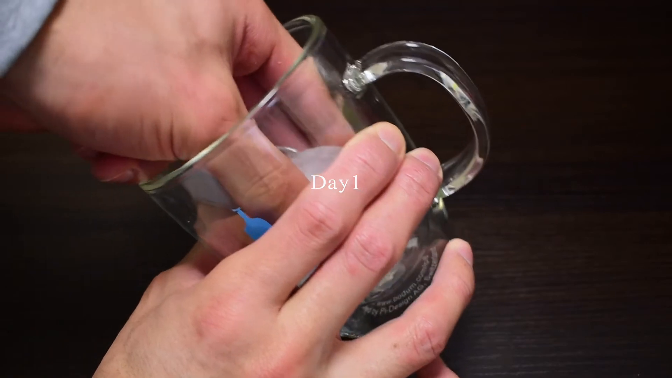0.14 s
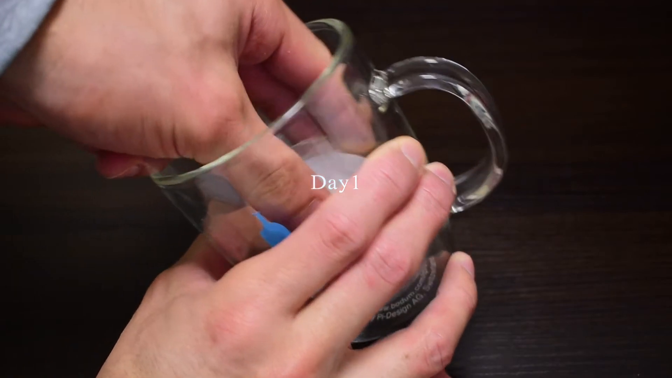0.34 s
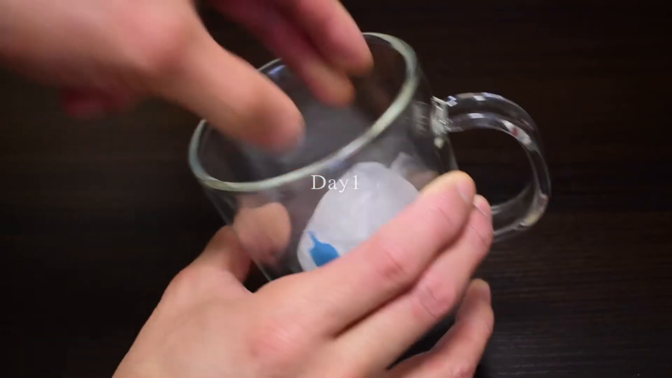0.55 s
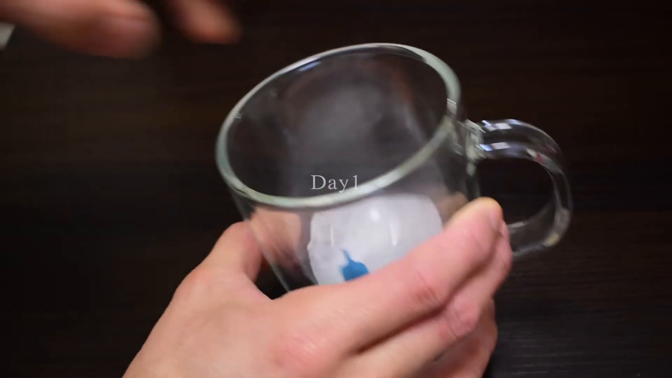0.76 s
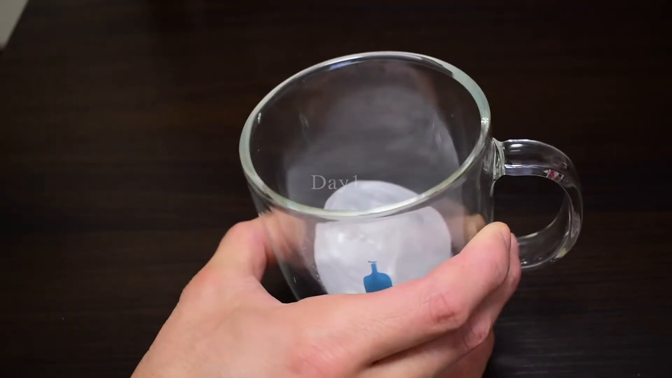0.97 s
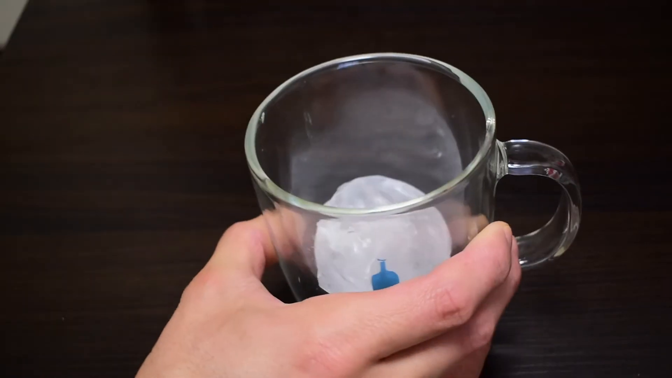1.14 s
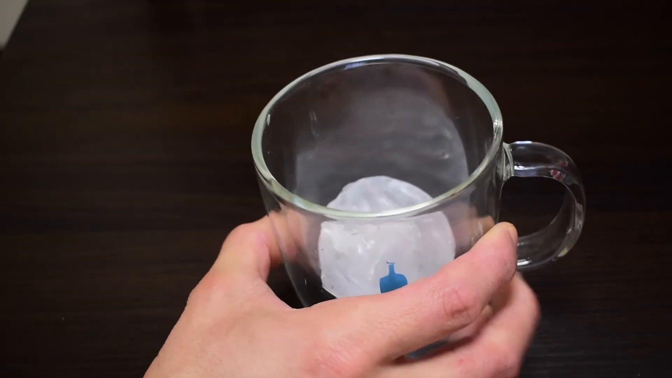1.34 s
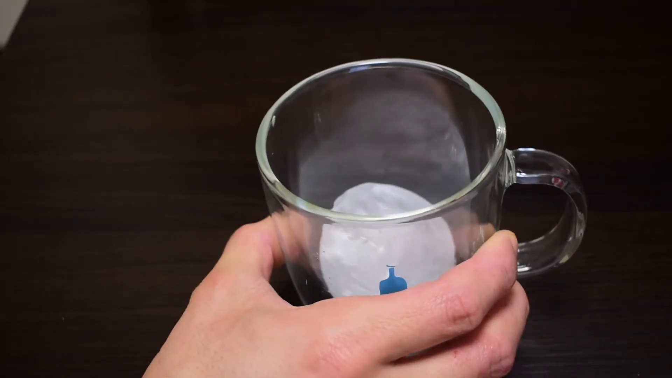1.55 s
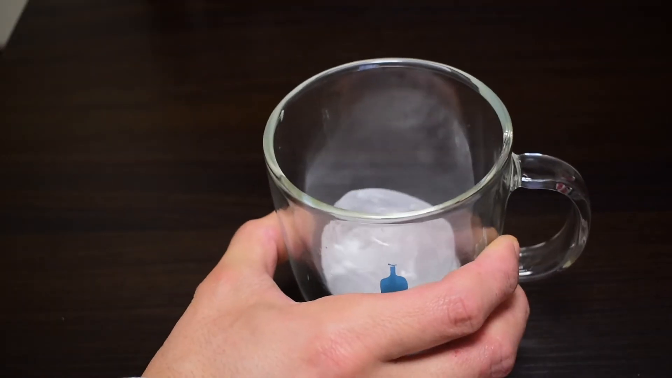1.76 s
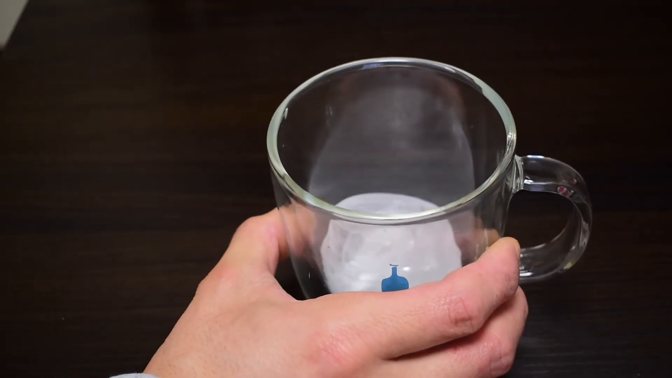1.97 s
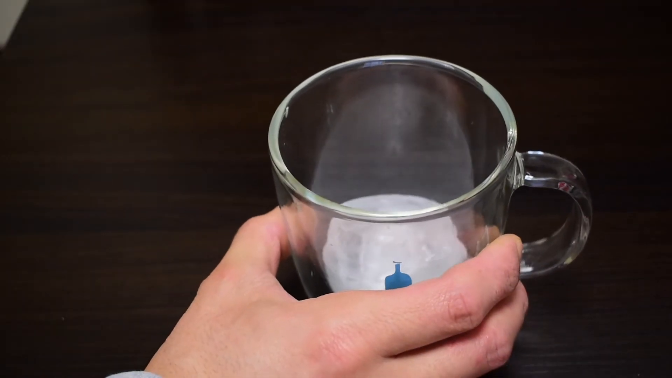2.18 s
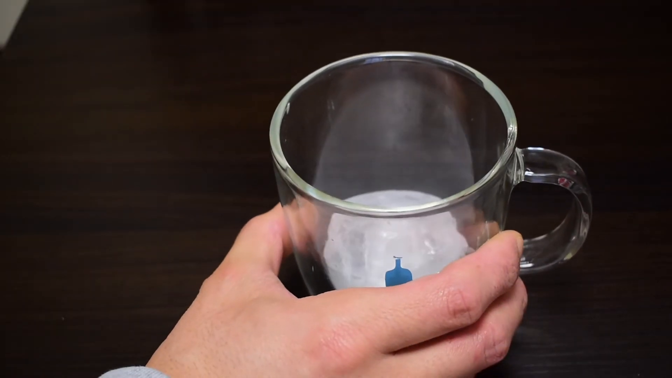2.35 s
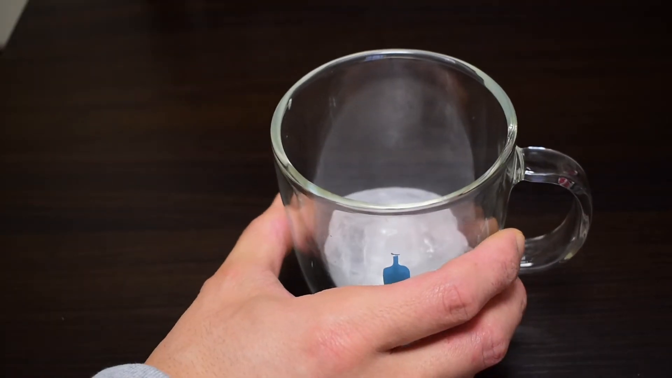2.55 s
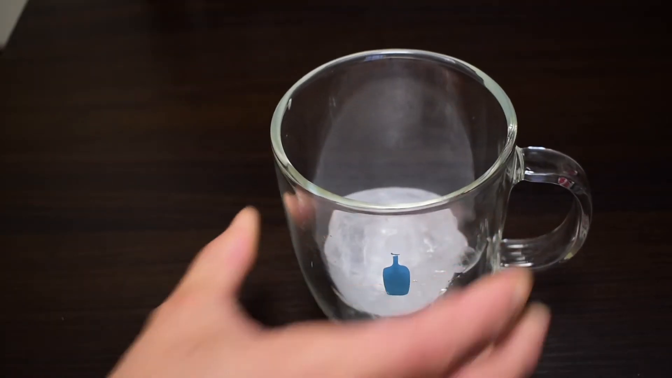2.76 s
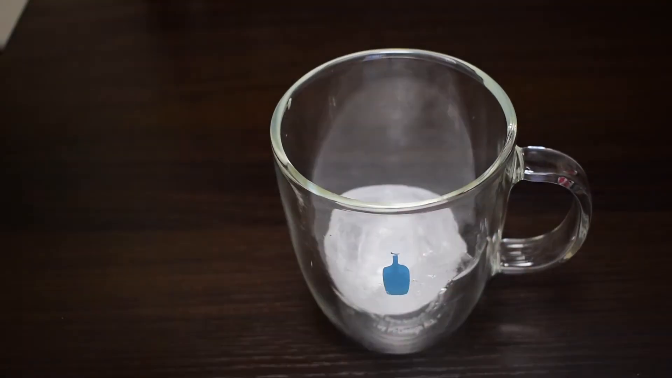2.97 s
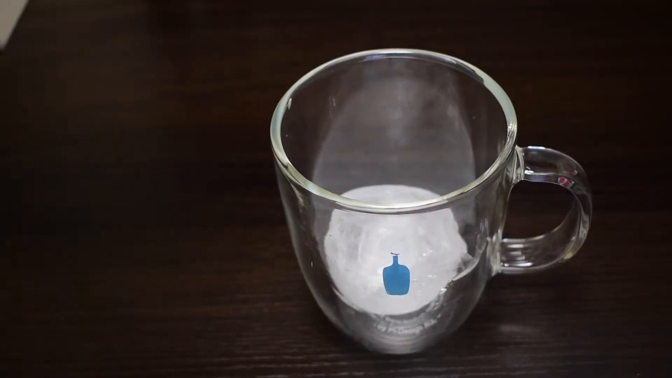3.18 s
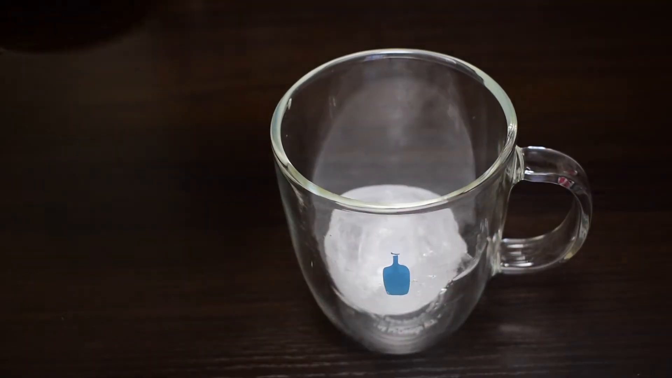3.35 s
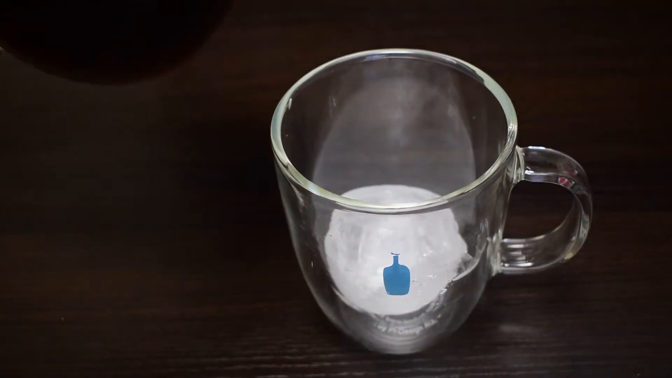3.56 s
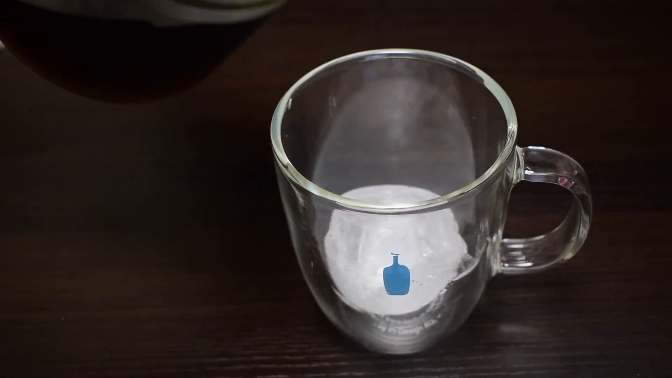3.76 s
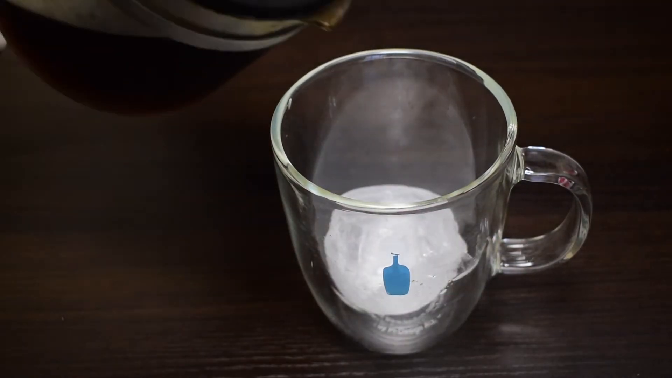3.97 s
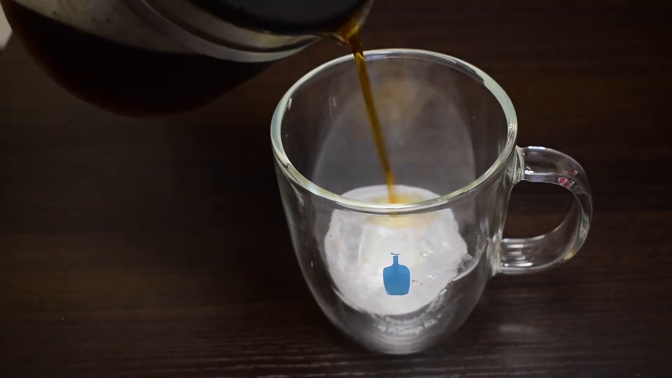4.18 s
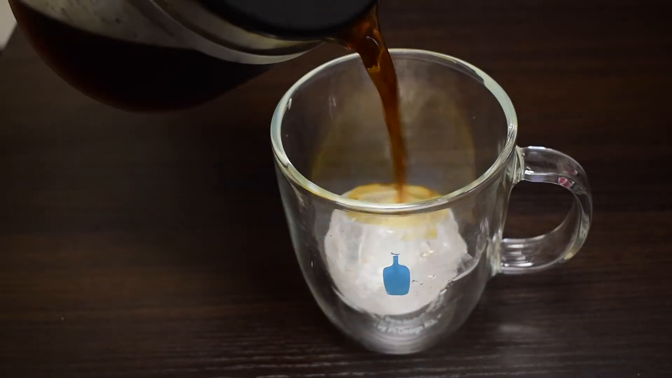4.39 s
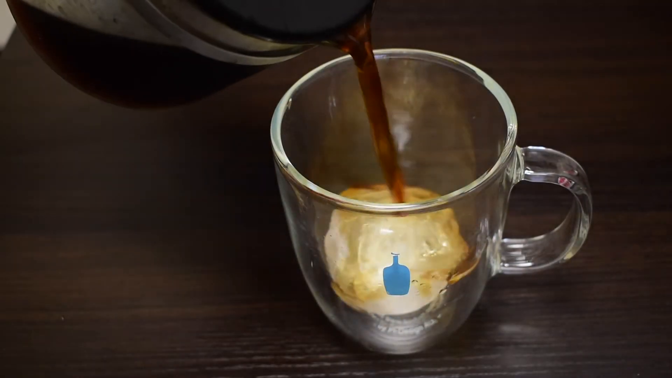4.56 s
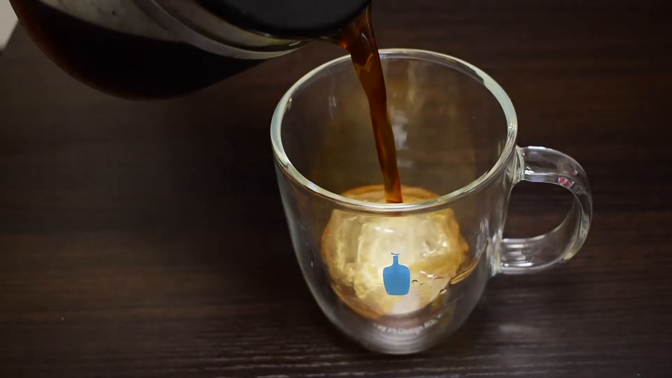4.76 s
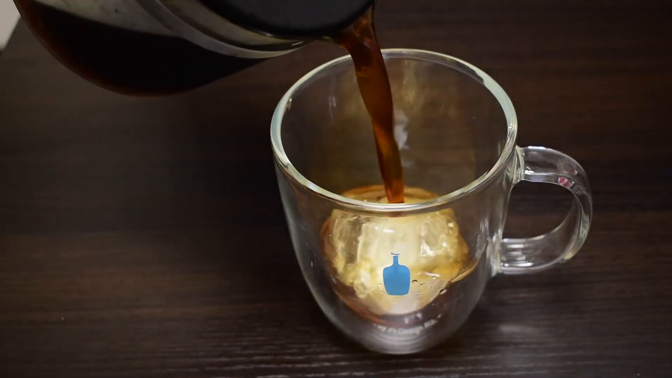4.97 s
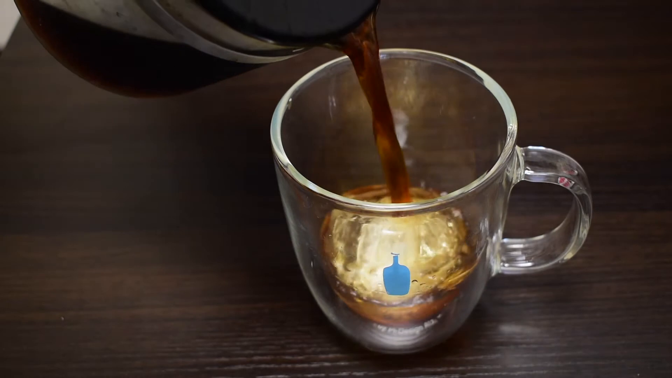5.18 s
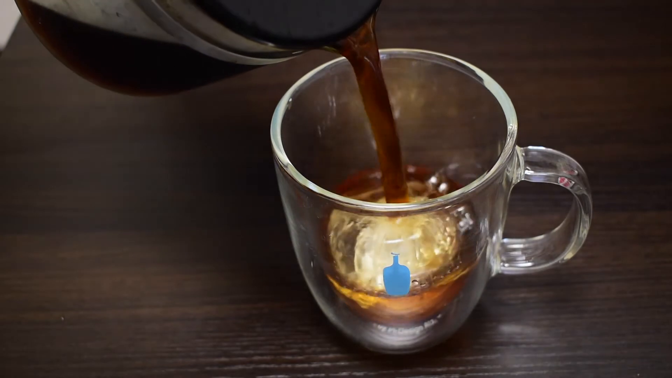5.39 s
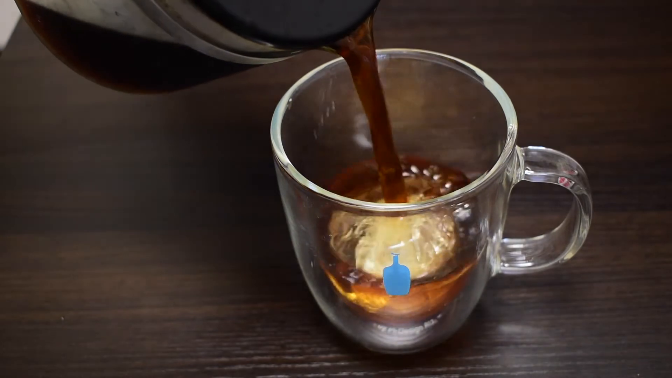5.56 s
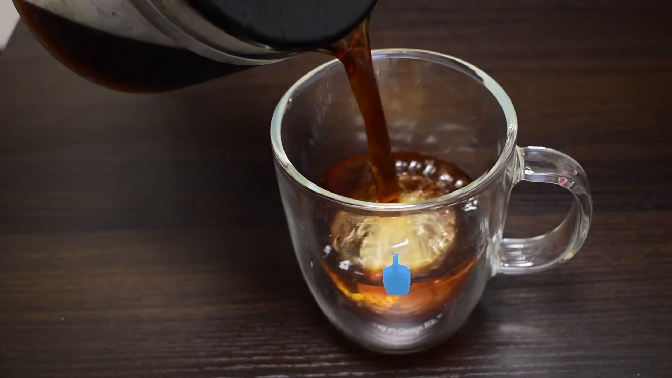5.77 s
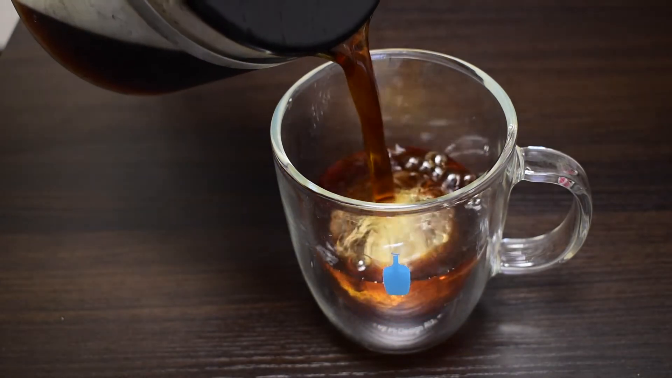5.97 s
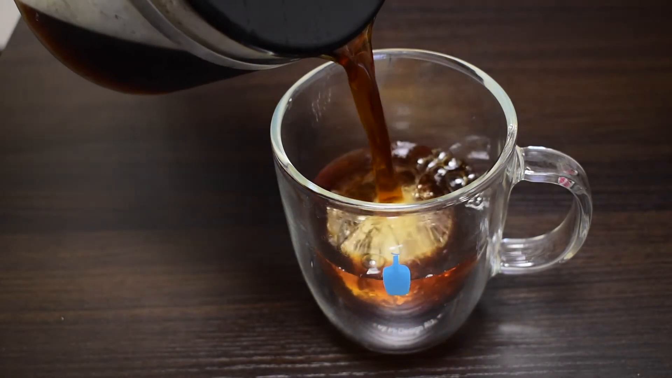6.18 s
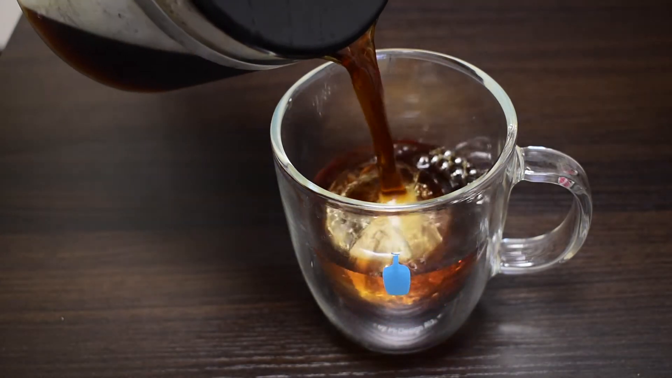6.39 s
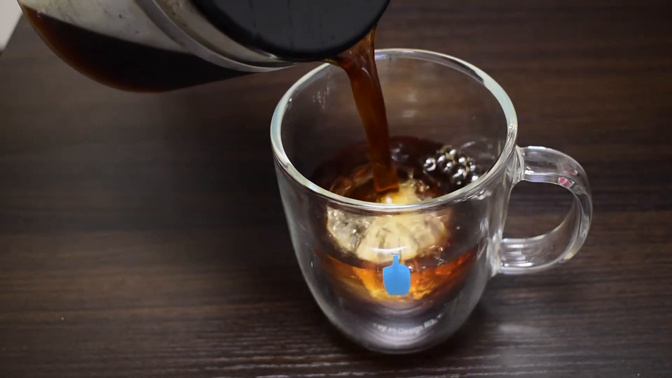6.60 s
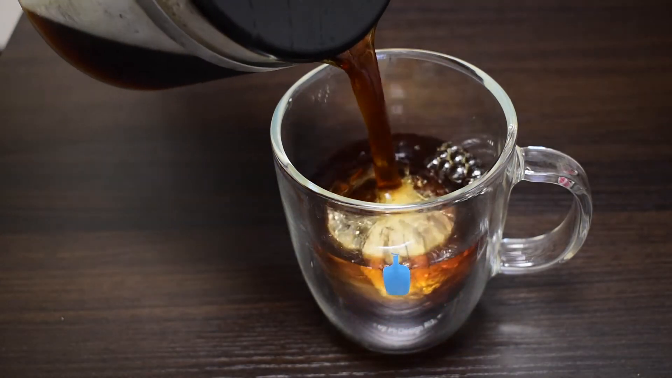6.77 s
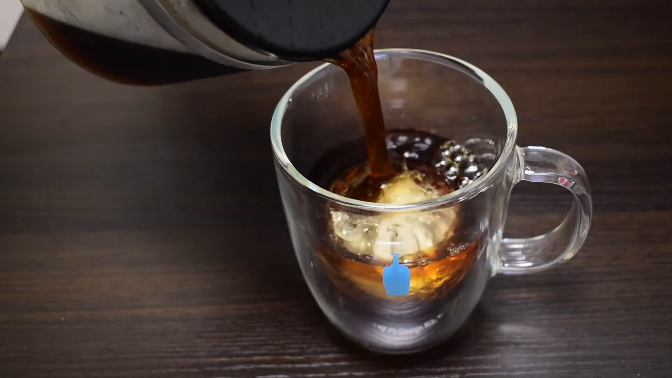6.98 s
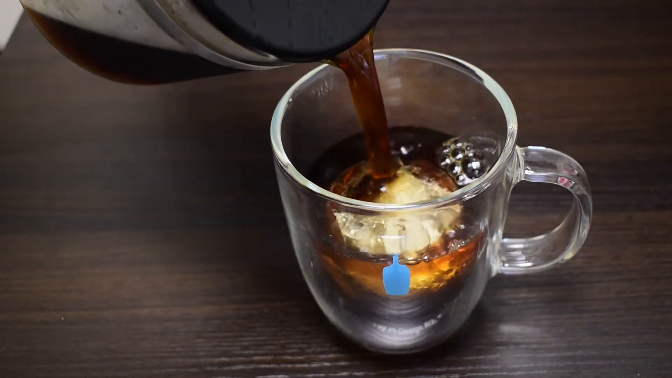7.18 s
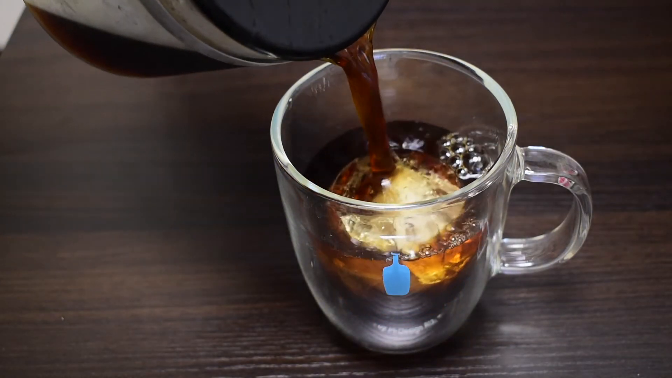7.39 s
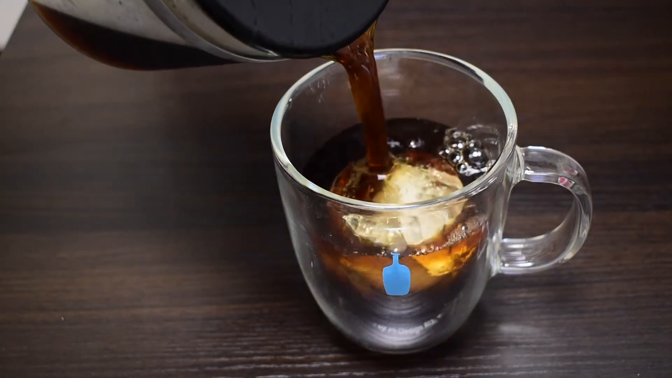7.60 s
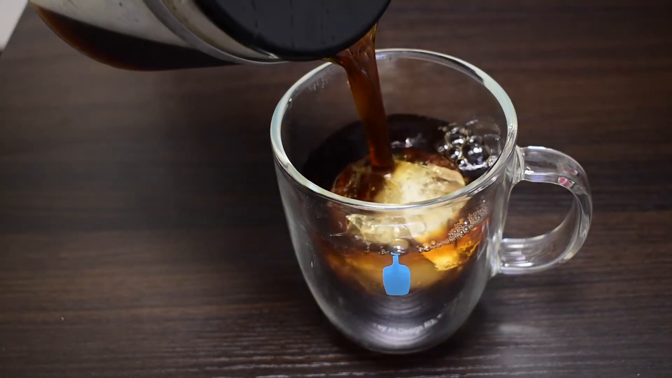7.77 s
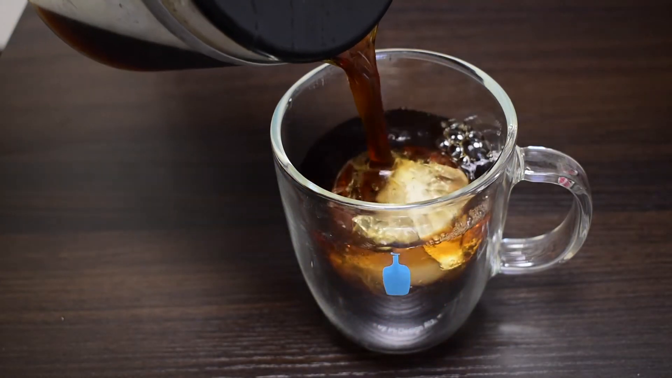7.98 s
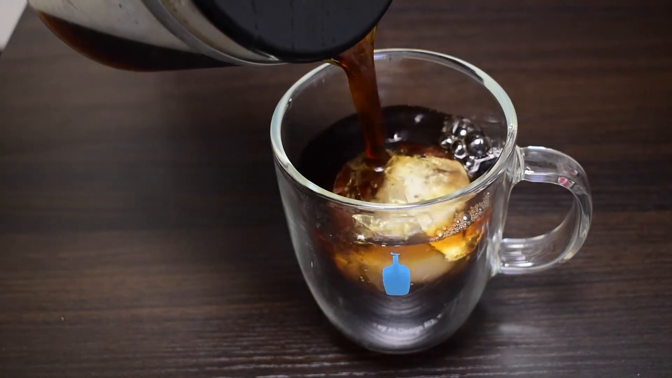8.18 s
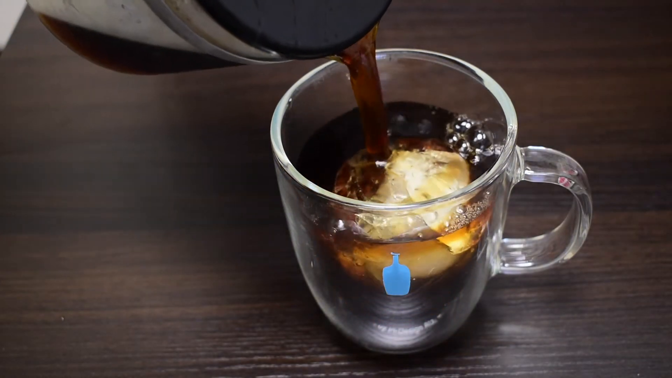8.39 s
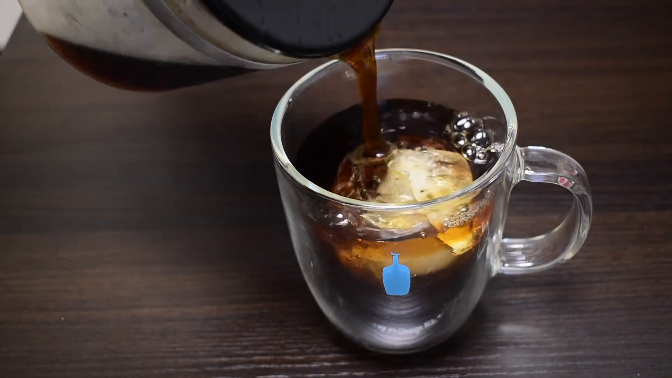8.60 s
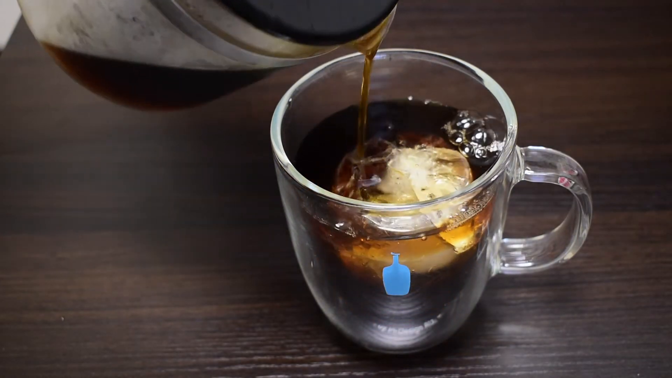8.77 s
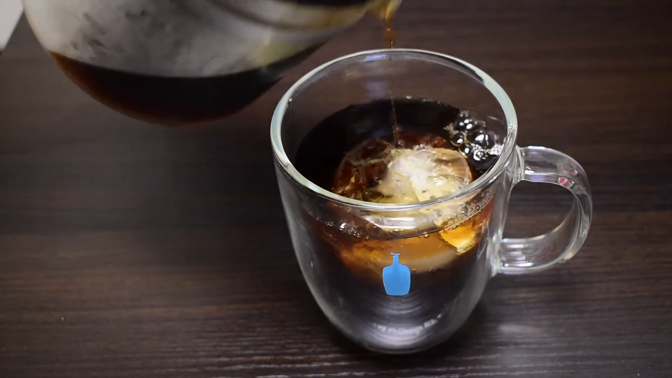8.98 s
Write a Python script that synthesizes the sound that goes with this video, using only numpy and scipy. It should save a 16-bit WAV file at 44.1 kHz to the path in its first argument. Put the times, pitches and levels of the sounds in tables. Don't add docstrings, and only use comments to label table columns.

```python
import sys
import numpy as np
from scipy import signal
from scipy.fft import rfft, irfft
from scipy.io import wavfile

SR = 44100
rng = np.random.default_rng(int(sys.argv[2]) if len(sys.argv) > 2 else 0)


def to_linear_factor(level_db):
    exponent = np.asarray(level_db, float) / 20
    return 10 ** exponent


def unload_wav(signal):
    wavfile.write(
        sys.argv[1],
        SR,
        np.round(np.clip(np.atleast_2d(signal).T, -1, 1) * 32767).astype(np.int16),
    )


N = 398663
T = np.arange(SR // 5) / SR
PATHS = 5


def along(points, hz):
    f, v = np.transpose(points)
    return np.interp(np.log(hz + 1), np.log(f + 1), v)


def unit(x):
    return x / np.sqrt(np.mean(x ** 2) + 1e-20)


def coloured(x, points):
    size = 8192
    half = size // 2
    gain = to_linear_factor(along(points, np.fft.rfftfreq(size, 1 / SR)))
    cepstrum = irfft(np.log(gain + 1e-9), size)
    folded = np.r_[cepstrum[0], 2 * cepstrum[1:half], np.zeros(half)]
    response = irfft(np.exp(rfft(folded)), size)
    response = response.reshape((1,) * (x.ndim - 1) + (size,))
    return signal.oaconvolve(x, response, axes=-1)[..., :x.shape[-1]]


def level(tables):
    time = np.arange(N) / SR
    return sum(to_linear_factor(np.interp(time, *np.transpose(rows), left=-150, right=-150)) for rows in tables)


def hiss(spectrum, alike):
    share = [(hz, 10 * np.log10(np.clip([1 + c, 1 - c], .004, 2))) for hz, c in alike]
    mid = coloured(rng.standard_normal(N), [(hz, db[0]) for hz, db in share])
    side = coloured(rng.standard_normal(N), [(hz, db[1]) for hz, db in share])
    return unit(coloured(np.array([mid + side, mid - side]), spectrum))


def add(tracks, s, sound):
    start = round((s + .0007) * SR)
    tracks[start % PATHS, start:start + len(sound)] += sound[:N - start]


def ring(hz, db, t60, attack, rise=0, rough=0):
    hz, db, t60, rough = (np.reshape(v, (-1, 1)) for v in (hz, db, t60, rough))
    steps = rng.standard_normal((len(hz), len(T) // 49))
    wander = np.cumsum(steps, axis=1).repeat(49, axis=1)
    t = T[:int(1.2 * SR * t60.max())]
    turns = hz * (t + rise * t * t / (2 * t60)) + rough * wander[:, :len(t)]
    envelope = (1 - np.exp(-t / attack)) * to_linear_factor(db - 60 * t / t60)
    return (envelope * np.sin(2 * np.pi * turns)).sum(axis=0)


def snap(colour, t60, attack, click=0):
    t = T[:int(1.2 * SR * min(t60, .15)) + 400]
    envelope = (1 - np.exp(-t / attack)) * to_linear_factor(-60 * t / t60)
    burst = envelope * rng.standard_normal(len(t))
    return coloured(burst + click * (t == 0), colour)


# pitch_hz, level_db (per Hz)
AIR_COLOUR = [(14, -41), (30, -7.5), (130, -6), (391, -2), (1230, -6), (3890, -14), (14100, -36.5),
              (16300, -50)]
# time_s, level_db
AIR_LEVEL = [(0.0, -51), (2.84, -59), (9.04, -60)]
# pitch_hz, likeness (0 to 1)
AIR_ALIKE = [(60, 0.53), (380, 0.33), (2380, 0.048)]


def room_air():
    return to_linear_factor(0.5) * level([AIR_LEVEL]) * hiss(AIR_COLOUR, AIR_ALIKE)


# time_s, level_db
HANDS_LEVEL = [(0.0, -76.5), (2.26, -52.5), (3.07, -70), (9.04, -74.5)]
# pitch_hz, level_db (per Hz)
HANDS_COLOUR = [(40, -19), (120, 0), (330, -2), (600, -13.5), (1200, -37.5)]


def hands():
    return to_linear_factor(-1.0) * level([HANDS_LEVEL]) * hiss(HANDS_COLOUR, [(200, 0.59)])


# start_s, level_db, free_s (until the next contact stills the glass)
DROPS = [
    (0.035, -18.5, .2),
    (0.1674, -19.5, .2),
    (0.3428, -18.5, .2),
    (0.4493, -18.5, 0.23),
    (0.5527, -25, .2),
    (2.201, -35.5, .2),
    (0.796, -5, 0.054),
    (0.847, -14, 0.11),
    (1.227, -40, .2),
    (4.5546, -30, .2),
]
# pitch_hz, level_db, fade_s (to -60 dB)
DROP_TONES = [
    [(835, -4.5, 0.06), (1198, 1, 0.054), (1330, -1, 0.11), (2130, -9, 0.056), (2440, -17, 0.13),
     (2750, -16.5, 0.12), (3165, -19, 0.14), (4850, -17, 0.11), (8060, -25.5, 0.12)],
    [(866, 0, 0.26), (1302, -2, 0.15), (2150, -19, .06), (3114, -13, 0.15), (3905, -5.5, 0.075),
     (5890, -18, .14), (6480, 1, 0.059)],
    [(705, -9.5, 0.11), (880, 2.5, 0.26), (1285, -4, .12), (1818, -11, .07), (2775, -11.5, 0.085),
     (3930, -11.5, .1), (4295, -21, 0.16), (5870, -18, .2), (6550, -8, .13)],
    [(930, -1, 0.17), (1245, -3, 0.22), (1800, -16, .06), (3122, -14, .3), (4000, -11.5, 0.16),
     (6410, -15, 0.07)],
    [(953, -2.5, .08), (2430, -12, 0.15), (3130, -22, .15), (3878, -8, 0.088)],
    [(2433, -4, 0.27), (3970, -11, 0.041), (5000, -20, .2), (6000, -18, 0.2), (8100, -5, 0.12)],
    [(1200, -2, 0.24), (2430, -24, .1), (2770, -18, 0.22), (3130, -12, 0.52), (3825, -19.5, .2),
     (8360, -20.5, .12)],
    [(987, 5, 0.071), (1200, 1, 0.24), (2500, -22, 0.15), (2770, -14, 0.3), (1290, -6, .15),
     (3870, -16.5, 0.17), (4300, -19, 0.19)],
    [(2463, -3, 0.14), (3130, -7, 0.12), (3950, -2, 0.1)],
    [(1010, -0.5, 0.055), (4300, -3, .04), (5600, -3.5, 0.045)],
]


def drops(glass):
    for (s, db, free_s), tones in zip(DROPS, DROP_TONES):
        hz, level_db, t60 = np.transpose(tones)
        rough = np.where(hz < 3500, .008, .04)
        sound = ring(hz, db - 5.5 + level_db, t60, 0.00073, rough=rough)
        damping = np.clip((free_s - T[:len(sound)]) / 0.0086, .03, 1)
        add(glass, s, sound * damping)


def struck(wall, colour, cycles):
    hz, db = np.transpose(wall)
    tops = [db[np.abs(np.log2(hz / f)) < .5].max() for f in hz]
    uneven_db = rng.normal(0, 3.0, len(hz))
    return ring(hz, db - tops + along(colour, hz) + uneven_db, cycles / hz, 0.00054, rough=0.067)


def clink(tracks, glass, s, db, cavity_hz, high_db, wall, wall_db, snap_db, body_db, cavity_t60, cycles,
          mid_under_db, top_under_db, snap_t60):
    top_db = high_db - top_under_db
    colour = np.array([(300, db - 24.5), (1000, db - 9.5), (1800, db - 15), (3400, db - mid_under_db),
                       (7300, high_db), (12800, top_db), (13800, top_db - 5.5), (14800, top_db - 28.0)])
    body = [(150, db - 40), (350, db - 8.0), (900, db + .1), (1500, db - 6.0), (2300, db - 23.0),
            (5000, db - 48.0)]
    boom_hz = np.array([.78 * cavity_hz, cavity_hz, 1270])
    boom_db = db + np.array([-18, -2, -10])
    add(tracks, s, ring(boom_hz, boom_db, [cavity_t60] * 3, 0.00074, rough=0.017))
    add(tracks, s, to_linear_factor(body_db) * snap(body, 0.08, 0.0014))
    add(glass, s, to_linear_factor(wall_db) * struck(wall, colour, cycles))
    add(tracks, s, to_linear_factor(snap_db) * snap(colour, snap_t60, .0003))


# start_s, air_level_db, air_pitch_hz, bright_level_db (5-10 kHz)
GRIPPED = [
    (0.036, -23, 1340, -42.5),
    (0.169, -19.5, 866, -34.5),
    (0.343, -15, 887, -24),
    (0.42, -28, 953, -61),
    (0.449, -18, 990, -42),
    (0.484, -32.5, 850, -57),
    (0.514, -40, 1200, -43.5),
    (0.554, -22.5, 953, -42),
    (0.626, -31.5, 705, -53),
    (1.877, -13, 987, -33),
]
# pitch_hz, level_db
GRIPPED_WALL = [(5947, -11), (5900, -11), (6610, 1), (6887, -9.5), (7800, -9), (8560, -6), (13100, -18)]


def gripped_clinks(tracks):
    for s, db, cavity_hz, high_db in GRIPPED:
        clink(tracks, tracks, s, db, cavity_hz, high_db, GRIPPED_WALL, wall_db=3.0, snap_db=4.5, body_db=9,
              cavity_t60=0.045, cycles=280, mid_under_db=db - (db - 15.5), top_under_db=12.0, snap_t60=0.022)


OPEN_MUG_HZ = 965
# start_s, air_level_db, bright_level_db
LOOSE = [(0.747, -31.5, -56.5), (0.773, -38, -42.5), (0.788, -11.5, -38), (0.796, -6, -27.5),
         (0.815, -20, -33), (0.847, -17.5, -33), (0.872, -26, -34), (1.226, -46, -53), (1.249, -31, -49),
         (1.283, -35.5, -46), (2.2006, -23.5, -46), (2.622, -43, -60)]
# pitch_hz, level_db
LOOSE_WALL = [(2469, 6.5), (2770, -32), (3130, -20.5), (3940, -13), (4630, -37), (5500, -22), (6730, -29),
              (7467, -33), (7840, -25), (8400, -20), (8730, -20), (9160, -27), (12650, -28)]


def loose_clinks(tracks, glass):
    for s, db, high_db in LOOSE:
        clink(tracks, glass, s, db, OPEN_MUG_HZ, high_db, LOOSE_WALL, wall_db=-1.5, snap_db=7.5, body_db=5.0,
              cavity_t60=0.059, cycles=220.0, mid_under_db=18.0, top_under_db=9, snap_t60=0.035)


# start_s, air_level_db, bright_level_db
ROCKING = [(1.057, -31, -48), (1.082, -32, -44.5), (1.109, -31.5, -61), (1.127, -33, -43.5),
           (1.14, -44, -50), (1.168, -43, -54), (1.293, -38, -54), (1.157, -29.5, -41.5),
           (1.593, -40, -52.5), (1.839, -41.5, -59), (1.886, -27.5, -31.5), (1.936, -34, -45.5),
           (1.972, -32, -39.5), (2.075, -38, -58.5)]
# pitch_hz, level_db
ROCKING_WALL = [(8300, -2), (8504, -0.5), (8070, -2), (9000, -10), (10260, -3.5), (12890, -3.5)]


def rocking_clinks(tracks):
    for s, db, high_db in ROCKING:
        clink(tracks, tracks, s, db, OPEN_MUG_HZ, high_db, ROCKING_WALL, wall_db=6, snap_db=2.5, body_db=-4.5,
              cavity_t60=0.024, cycles=120, mid_under_db=30.5, top_under_db=5.5, snap_t60=.045)


# time_s, level_db
RUBS = [
    [(1.24, -64), (1.3, -50), (1.41, -52), (1.5, -66)],
    [(3.5, -70), (3.53, -57), (3.62, -58), (3.72, -70)],
]
# pitch_hz, level_db (per Hz)
RUB_COLOUR = [(150, -25), (400, 0), (560, -7), (800, -4), (1100, -14), (3000, -40)]


def rubs():
    return level(RUBS) * unit(coloured(rng.standard_normal(N), RUB_COLOUR))


def board_knock(tracks, glass, s, db, edge_db, board, attack, puff_db, dull_db):
    hz, level_db = np.transpose(board)
    tone_db = db - 4.5 + level_db + dull_db * np.log2(hz / 311)
    fade_s = [0.1] * len(hz)
    colour = [(60, db - 34.5), (130, db - 0.5), (1200, db + dull_db), (2500, edge_db + 3.5),
              (3600, edge_db - 8.5), (5500, edge_db - 32), (12000, edge_db - 54), (16000, edge_db - 85.0)]
    add(glass, s - 0.0003, ring(hz, tone_db, fade_s, attack, rough=0.012))
    add(tracks, s + 0.0004, to_linear_factor(puff_db) * snap(colour, 0.066, attack))


# start_s, level_db, edge_level_db (1.5-4 kHz)
LANDINGS = [
    (1.5825, -8, -28.5),
    (1.878, -1, -12.5),
]
# pitch_hz, level_db
EDGE_BOARD = [(221, 2), (339, 1), (420, -4.5), (484, -5.5), (700, -10), (856, -8.5), (1017, -8.5),
              (1120, -13.5), (1480, -15), (285, -2), (2180, -20.5)]
# pitch_hz, level_db
BOARD = [(223, -8.5), (310, 3.5), (420, -12.5), (536, -3.5), (607, -5.5), (766, -7), (985, -3),
         (1118, -6.5), (1212, -8.5), (2080, -21.5), (2290, -23.5)]


def landings(tracks, glass):
    board_knock(tracks, glass, *LANDINGS[0], EDGE_BOARD, attack=.0006, puff_db=8, dull_db=-2.5)
    board_knock(tracks, glass, *LANDINGS[1], BOARD, attack=.001, puff_db=7.5, dull_db=0.1)


# start_s, level_db
ROLLS = [
    (2.174, -33),
    (1.839, -30),
    (2.184, -15),
    (2.193, -13),
    (2.4, -31.5),
    (2.43, -32.5),
    (2.592, -36),
    (2.623, -39.5),
]
# start_s, level_db
SLEEVE = [
    (3.523, -47),
    (3.583, -47),
    (3.639, -55),
]


def gentle_contacts(tracks, glass):
    events = [(s, db, db - 17.5) for s, db in ROLLS] + [(s, db, db - 41) for s, db in SLEEVE]
    for s, db, edge_db in events:
        board_knock(tracks, glass, s, db, edge_db, BOARD, attack=.007, puff_db=4, dull_db=-4)


# time_s, level_db
SKIN_SLIDES = [
    [(2.2, -66.5), (2.62, -64.5), (2.74, -55), (2.842, -50.5), (2.856, -54.5)],
    [(2.9, -72), (2.92, -63), (2.956, -56), (3.1, -76.5)],
]
# pitch_hz, level_db (per Hz)
SKIN_COLOUR = [(180, -38), (300, -5.5), (1930, -2.5), (3580, -3), (10600, -21), (16000, -30.5)]


def skin():
    return to_linear_factor(2.5) * level(SKIN_SLIDES) * hiss(SKIN_COLOUR, [(1000, 0.73)])


# start_s, level_db, pitch_hz
BUBBLES = [(4.506, -49.5, 1405), (4.825, -35.5, 1200), (5.109, -43, 700), (5.164, -27.5, 1150),
           (5.221, -29.5, 1350), (5.436, -48.5, 780), (5.542, -35.5, 543), (5.437, -49, 520),
           (5.83, -47, 807), (6.169, -44, 448), (6.229, -46, 785), (6.26, -38.5, 1054), (5.826, -49.5, 567),
           (6.164, -45, 780), (6.212, -45, 455), (6.247, -29.5, 1577), (6.36, -38, 1330),
           (6.375, -35.5, 1350), (6.435, -36.5, 1380), (6.45, -31.5, 1357),
           (5.13, -34, 1760), (5.563, -42, 2715), (5.575, -41, 2340), (5.59, -42, 2960), (5.584, -43, 1050),
         (5.545, -47, 2150), (6.105, -50.5, 1700), (6.25, -37, 3290), (6.262, -38, 2740), (6.36, -50, 4300),
         (6.62, -46, 4400), (4.662, -40.5, 3100), (4.664, -43.5, 1400),(5.1812, -28, 2114),
         (5.461, -42, 3340), (5.485, -40, 3870), (5.5288, -41, 3070), (5.6149, -41, 1890),
         (5.7202, -46, 1770), (5.8326, -41.5, 2990), (5.8594, -40, 2770), (6.0132, -48, 1935),
         (6.105, -42, 2870), (6.3586, -46, 2770), (6.42, -43, 3830), (6.4303, -35.5, 2900),
         (6.4486, -33, 2990), (6.4878, -40, 4060), (6.6212, -28.5, 2970), (6.7805, -39, 2800),
         (6.856, -43, 2900), (6.9486, -48, 3000), (7.09, -43.5, 4300), (7.678, -49, 3840),
         (7.7142, -46, 2860), (7.82, -43, 2156), (7.912, -44, 3620), (7.9255, -34.5, 3180),
         (8.026, -40, 2200), (8.04, -41, 2080), (8.09, -40.5, 2810), (8.3676, -41.5, 3085),
           (5.937, -50.5, 6100), (5.937, -55, 3400), (6.013, -54, 2800), (6.038, -50, 2900),
         (6.06, -50.5, 1700), (6.135, -55, 4200), (3.4, -58, 1800), (7.2, -58, 2700), (5.9, -55.5, 610),
         (6.9, -44, 840), (7.822, -39, 3000), (7.83, -45, 4200), (7.705, -58, 2070), (7.927, -46.5, 1700),
         (7.932, -44, 5000), (8.8, -52, 2100), (8.035, -45, 4300), (8.026, -51.5, 6300), (5.7, -58, 2900),
         (6.385, -54, 4400), (6.553, -29.5, 6300), (7, -57, 3100), (4.5072, -45, 6000),
         (4.7627, -46.5, 4132), (5.142, -30, 6700), (5.247, -32.5, 6500), (6.234, -29, 5570),
         (6.4353, -39, 4454), (7.089, -47.5, 6950), (6.6, -48, 4700), (8.5, -48, 4350),
         (7.944, -40.5, 4540), (7.2, -52, 4720), (8.0245, -49, 5000), (8.296, -51, 3120)]


def bubbles(tracks):
    for s, db, hz in BUBBLES:
        t60 = 0.027 * (hz / 2500) ** -.45
        rough = 0.12 * min(hz / 2600, 1)
        add(tracks, s, ring(hz, db, t60, 0.00068, rise=0.07, rough=rough))
        for late, ratio, drop_db in rng.uniform([0, .8, 6], [.02, 1.15, 13], (2, 3)):
            follower = ring(hz * ratio, db - drop_db, 0.57 * t60, 0.0011, rise=0.052, rough=0.079)
            add(tracks, s + late, follower)


def ice_colour(db, low_db, high_db, top_db):
    return np.array([(90, low_db - 15), (230, low_db - 13), (320, low_db - 5), (450, low_db - 9),
                     (750, low_db - 5.0), (1300, low_db), (3600, db), (7300, high_db), (12500, top_db),
                     (18000, top_db - 5.0)])


# start_s, level_db (5-10 kHz)
DULL_TICKS = [(5.1118, -45), (5.142, -38), (5.221, -36.5), (5.436, -45), (5.4484, -40), (5.477, -38.5),
              (6.2494, -56), (6.3739, -45), (6.5518, -18.5), (6.7714, -54), (6.7845, -44.5), (6.857, -43),
              (7.4127, -46.5), (7.9334, -53)]
# start_s, level_db (5-10 kHz)
THIN_TICKS = [
    (4.52, -60),
    (4.4533, -51),
    (5.4954, -28.5),
    (5.5792, -35.5),
    (5.8594, -54.5),
    (5.9359, -46.5),
    (6.106, -44.5),
    (6.8964, -48),
    (8.6462, -57.5),
]


def ticks(tracks):
    dull = [(s, db, db - 16.0) for s, db in DULL_TICKS]
    thin = [(s, db, db - 5.5) for s, db in THIN_TICKS]
    for s, high_db, top_db in dull + thin:
        colour = ice_colour(high_db - 0.5, high_db - 18.0, high_db, top_db + 7.0)
        add(tracks, s, to_linear_factor(0.5) * snap(colour, 0.016, 0.00033, click=2.3))


# start_s, then its colour as pitch_hz, level_db
FIRST_CRACK = [
    (4.553, [(300, -35.5), (1000, -20), (2200, -20.5), (4000, -19), (5800, -23), (8000, -29.5), (12500, -34.5), (18000, -41)]),
]
# start_s, level_db (2-5 kHz),
# high_level_db (5-10 kHz), top_level_db (10-16 kHz)
CRACKS = [(4.6614, -39, -40.5, -45.5), (4.8178, -40, -40, -43), (5.1512, -45, -31.5, -51),
          (5.1826, -32.5, -79, -70), (5.459, -61, -47, -48), (5.5012, -42, -41.5, -30.5),
          (5.5642, -34.5, -64.5, -45.5), (6.2312, -37.5, -34.5, -58), (6.6214, -43.5, -49.5, -42),
          (7.8222, -42, -77.5, -83.5), (8.0244, -54.5, -58, -70)]


def cracks(tracks):
    for s, colour in FIRST_CRACK:
        add(tracks, s, to_linear_factor(6.0) * snap(colour, 0.0018, .0001, click=6.5))
    for s, db, *highs in CRACKS:
        colour = ice_colour(db, db - 3.5, *highs)
        add(tracks, s, to_linear_factor(10.5) * snap(colour, 0.0029, 0.0001, click=5.2))


# start_s, level_db (2-5 kHz), low_level_db, high_level_db, top_level_db
SPLITS = [
    (4.8653, -14.5, -9, -9.5, -15.5),
    (5.2659, -32.5, -28, -30.5, -30.5),
    (6.517, -21.5, -27, -29, -25),
]
# pitch_hz, level_db, fade_s (to -60 dB)
SPLIT_TONES = [
    [(1023, -6, 0.44), (1211, -6.5, .25), (1297, -5, 0.45), (1730, -6, .35), (2444, -12, 0.35),
     (3125, -15, .4), (3952, -13.5, 0.26), (5490, -5.5, 0.4), (6188, -8.5, .22), (7400, -13.5, 0.15),
     (8100, -5.5, .35), (9290, -9, .23), (9860, -5.5, .3), (10330, -7.5, .28)],
    [(2580, -4.5, 0.57), (3184, -0.5, 0.48), (3410, -6, 0.27), (4180, 3.5, .3), (4400, 2, .25),
     (4710, 4, 0.17), (5039, 3, .25), (5500, -3, 0.18), (6130, 4, 0.15), (7400, 0, .22), (8100, -11, .2),
     (10500, 1, .15)],
    [(1235, -22, 0.12), (2750, 1, 0.29), (3100, -4, 0.13), (3680, -7, 0.074), (4317, -4.5, 0.19),
     (5120, -12, 0.14), (6099, -8, .2), (6640, -4, 0.19), (6950, 1, 0.073), (9880, -14, .25)],
]
# pitch_hz, level_db (over the split), fade_s
SPLIT_JOLTS = [
    (1400, 18.5, 0.0096),
    (4530, 14, 0.019),
    (1250, -9, 0.021),
]


def splits(tracks):
    ring_dbs, noise_t60s, twin_dbs = (-1.5, -6, -5), (.09, .1, .09), (-1.5, -3.5, -9)
    rows = zip(SPLITS, SPLIT_TONES, SPLIT_JOLTS, ring_dbs, noise_t60s, twin_dbs)
    for (s, *levels), tones, (jolt_hz, jolt_db, jolt_t60), ring_db, t60, uneven_db in rows:
        hz, db, decay = np.transpose(tones)
        fade_s = 0.4 * np.clip(decay, .05, .6)
        colour = ice_colour(*levels)
        for detune, twin_db in [(1, -0.5), (1.011, uneven_db)]:
            tone_db = db + levels[0] + ring_db + twin_db
            add(tracks, s, ring(hz * detune, tone_db, fade_s, 0.00015, rough=0.046))
        add(tracks, s, ring(jolt_hz, levels[0] + jolt_db, jolt_t60, 0.001))
        add(tracks, s, to_linear_factor(-1.5) * snap(colour, t60, .0001))
        add(tracks, s, to_linear_factor(10.5) * snap(colour, 0.0091, .0001, click=0.61))


# time_s, level_db
POUR = [
    [(5.1, -62), (5.17, -50), (5.55, -64.5), (5.75, -72), (6.45, -61.5), (7.1, -71)],
    [(7.3, -75), (7.85, -65), (8.4, -78)],
]


def splash(count=900):
    s = rng.uniform(4.95, 8.5, count)
    pitch = rng.standard_normal(count)
    size = rng.exponential(1, count)
    hz = np.clip(2600 * np.exp(.5 * pitch), 1400, 14000)[:, None]
    t = T[:900]
    loudness = to_linear_factor(5.7 * np.minimum(size, 2.4))[:, None]
    envelope = (hz * t) * np.exp(-hz * t / 6.4)
    grains = loudness * np.sin(2 * np.pi * hz * t * (1 + 6 * t)) * envelope
    where = (s * SR).astype(int)[:, None] + np.arange(len(t))
    return to_linear_factor(-13.0) * level(POUR) * unit(np.bincount(where.ravel(), grains.ravel(), N))


# pitch_hz, level_db, fade_s (to -60 dB)
JUG_TONES = [(141.6, -51.5, 0.16), (953, -44.5, 0.19), (3060, -50, 0.056)]


def jug(tracks):
    add(tracks, 8.817, ring(*np.transpose(JUG_TONES), 0.00092, rough=0.014))


# pitch_hz, fade_s (to -60 dB)
ECHO_FADE = [(100, 0.33), (300, 0.3), (600, 0.33), (1500, 0.24), (4000, 0.32), (9000, 0.28), (15000, 0.11)]
# pitch_hz, level_db
ECHO_SPREAD = [(1000, -20), (2200, -9.5), (4000, -15), (12000, -1.5)]


def room(tracks):
    hz, t, z = signal.stft(rng.standard_normal((PATHS, 2, SR // 2)), SR, nperseg=256)
    fading = to_linear_factor(-60 * t / along(ECHO_FADE, hz)[:, None])
    tail = signal.istft(z * fading, SR, nperseg=256)[1]
    tail = tail * np.clip(np.arange(tail.shape[-1]) / SR / 0.0015 - .3, 0, 1)
    tail = tail / np.linalg.norm(tail, axis=-1, keepdims=True)
    mid, side = (signal.fftconvolve(tracks, tail[:, k], axes=1).sum(axis=0)[:N] for k in (0, 1))
    side = coloured(side, ECHO_SPREAD)
    return tracks.sum(axis=0) + to_linear_factor(-5.0) * np.array([mid + side, mid - side])


# pitch_hz, level_db
GLASS_ECHO = [(1500, -6), (2300, -10.5), (3300, -15), (3700, -6)]


def scene():
    tracks, glass = np.zeros((2, PATHS, N))
    drops(glass)
    gripped_clinks(tracks)
    loose_clinks(tracks, glass)
    rocking_clinks(tracks)
    landings(tracks, glass)
    gentle_contacts(tracks, glass)
    stirring = coloured(glass, GLASS_ECHO)
    tracks += stirring
    for source in (bubbles, ticks, cracks, splits, jug):
        source(tracks)
    tracks[0] += splash()
    glass_direct = (glass - stirring).sum(axis=0)
    near = coloured(room(tracks) + glass_direct, [(25, -23.5), (90, -9.5), (130, 0)])
    quiet = room_air() + hands() + rubs() + skin()
    return near * to_linear_factor(np.array([[-.6], [.6]])) + quiet * to_linear_factor(np.array([[-.45], [.45]]))


def band_limit(x):
    return signal.sosfilt(signal.butter(12, 16410, fs=SR, output="sos"), x)


def record(dry):
    limited = dry / (1 + np.abs(dry) ** 8) ** (1 / 8)
    full = coloured(limited, [(20, -7.5), (90, -0.5), (14000, 0), (15700, -5.5), (16400, -32)])
    return band_limit(np.clip(full, -1, 1))


dry = scene()
out = record(dry)
unload_wav(out)
```